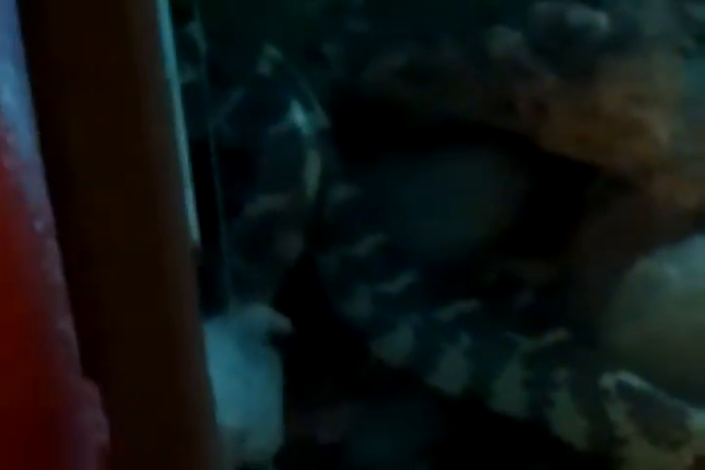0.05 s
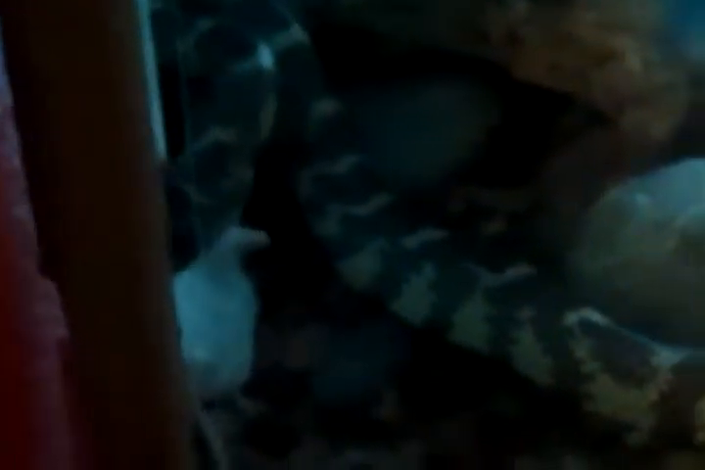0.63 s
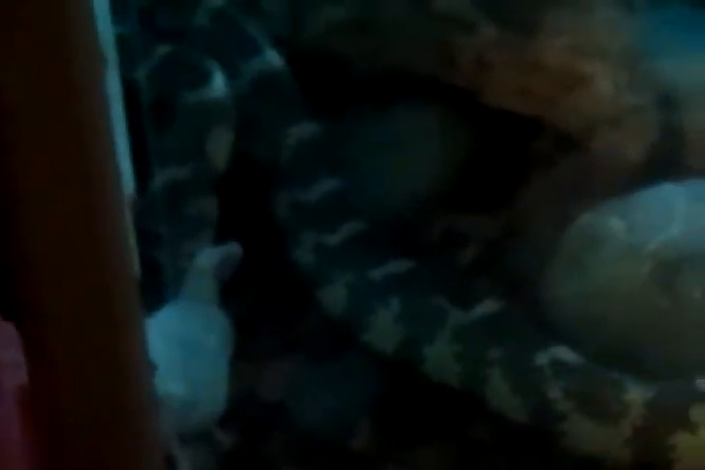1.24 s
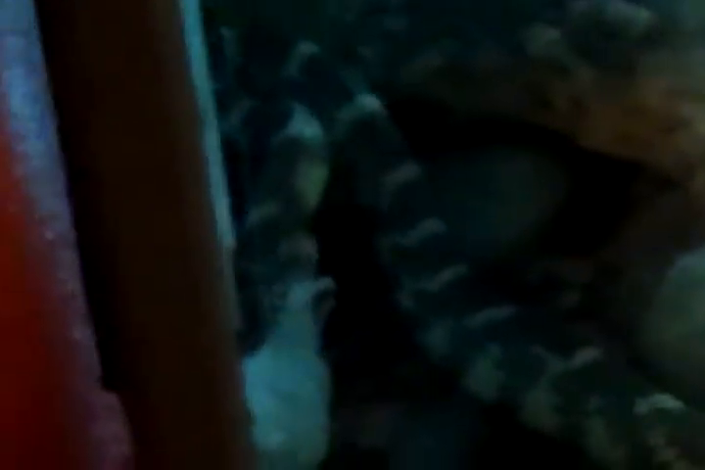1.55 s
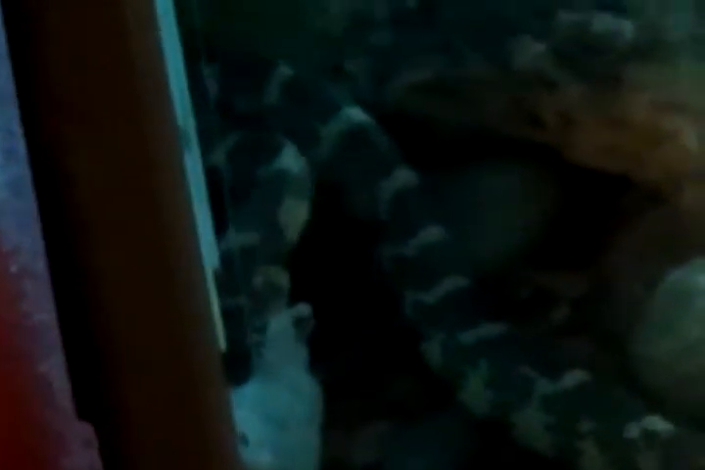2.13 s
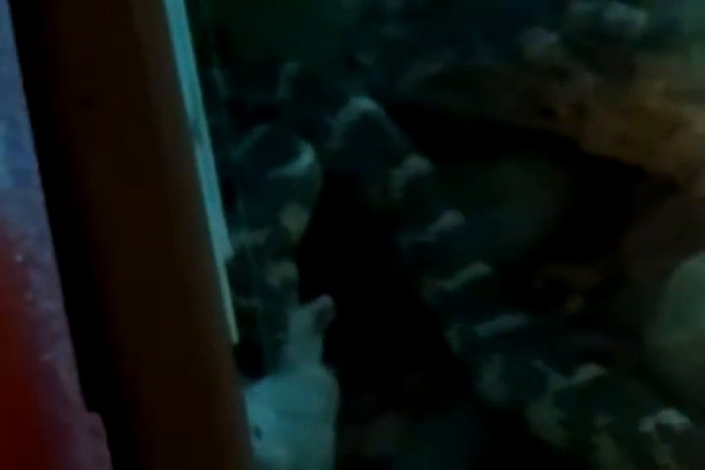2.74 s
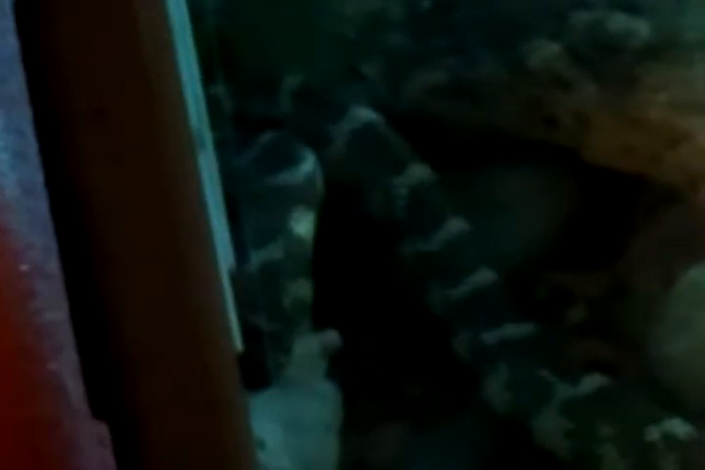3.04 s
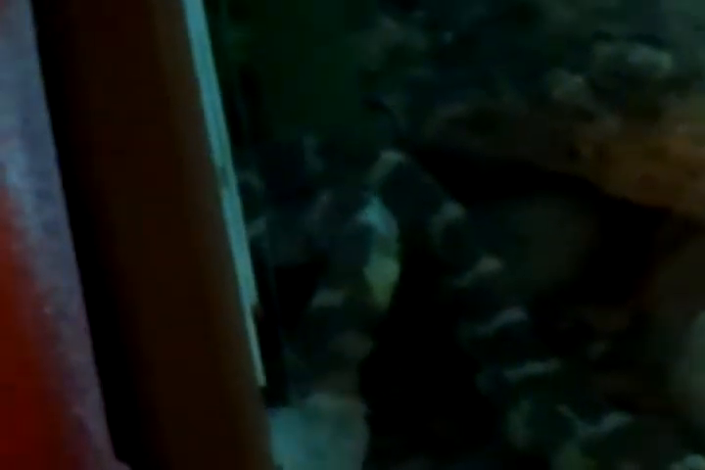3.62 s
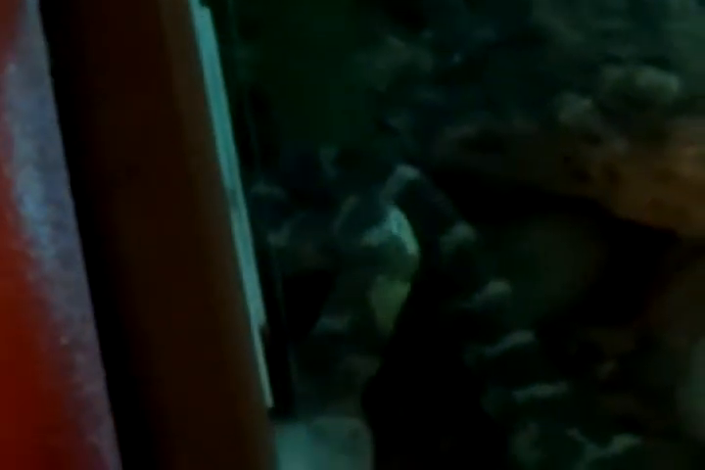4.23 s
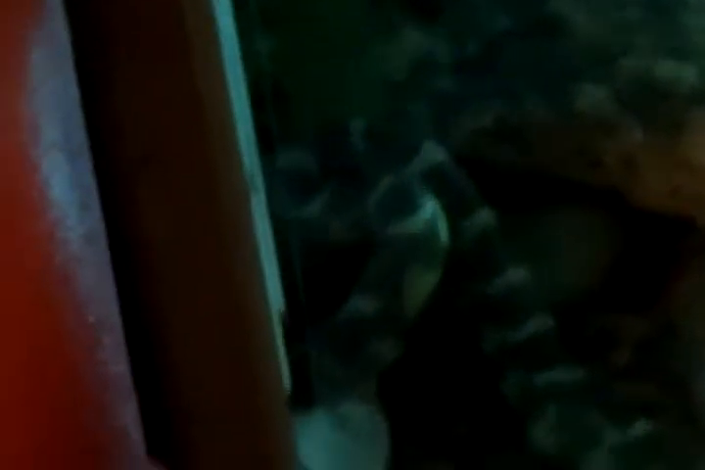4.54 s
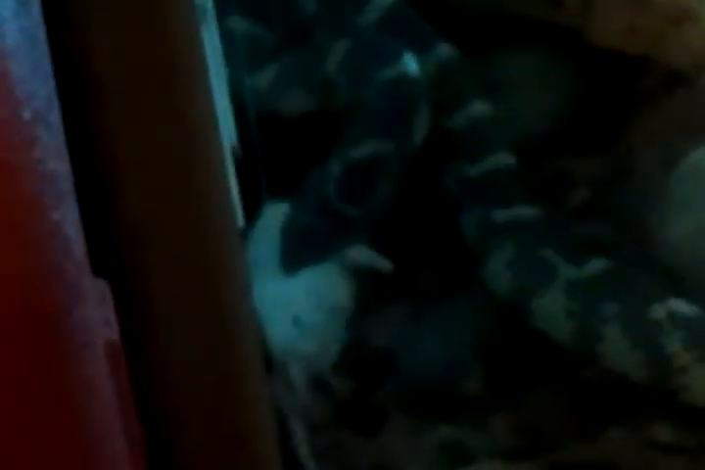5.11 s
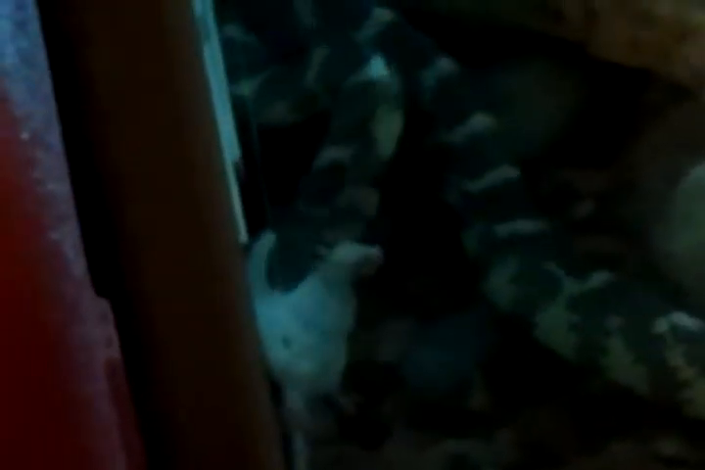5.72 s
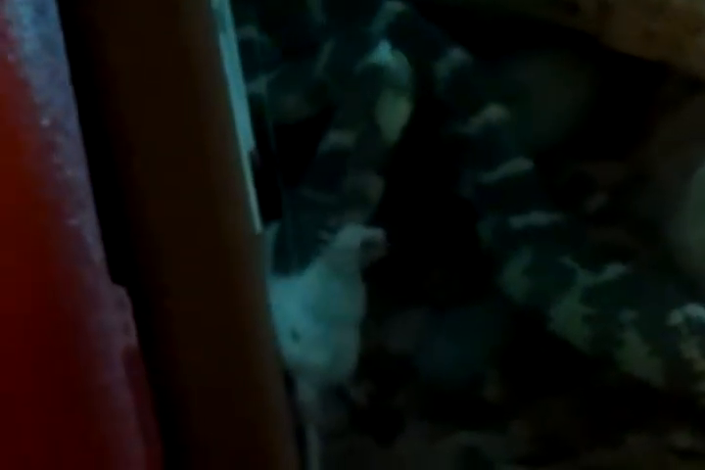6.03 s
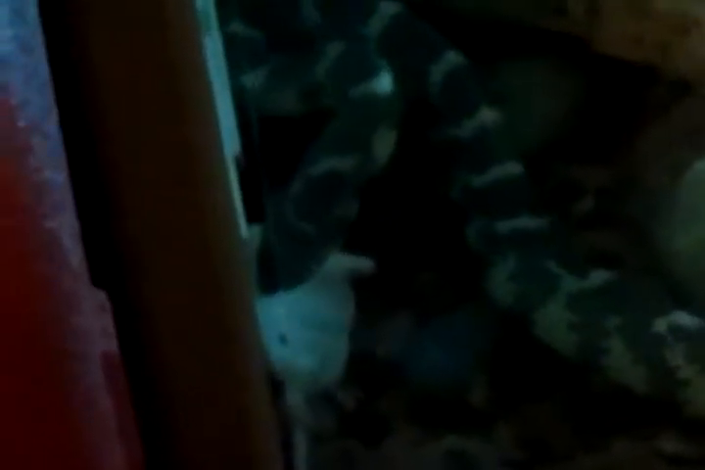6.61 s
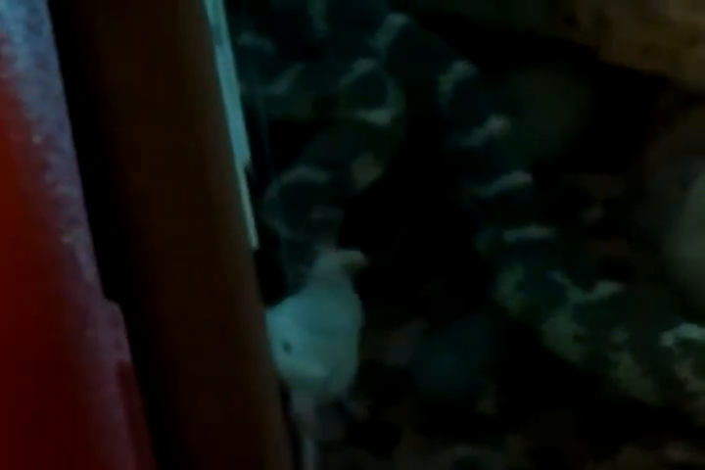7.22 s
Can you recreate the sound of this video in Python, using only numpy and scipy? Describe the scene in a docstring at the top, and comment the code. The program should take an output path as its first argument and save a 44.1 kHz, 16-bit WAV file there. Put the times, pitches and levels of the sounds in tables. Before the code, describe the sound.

A snake's scales faintly brush over stones a few times under steady low rumble and hiss in a quiet room.

```python
"""A quiet room with a terrarium, where a snake slowly drags a mouse over stones.
From the start, soft room rumble and a faint mains hum lie under the hiss of a small camera's amplifier.
At 2.8 s the snake's scales brush the ground, a friction noise made of many tiny clicks.
Near 3.7 s the low rumble swells faintly and briefly; just after, one grain of grit ticks on a stone.
Between 5.2 and 5.7 s the scales brush three more times; then the steady background is left."""
import sys
import numpy as np
from scipy import signal
from scipy.fft import rfft, irfft
from scipy.io import wavfile

SR = 44100
rng = np.random.default_rng(int(sys.argv[2]) if len(sys.argv) > 2 else 0)


def file_out(sig):
    """Save sig as 16-bit WAV at sys.argv[1]."""
    # one column per channel
    cols = np.atleast_2d(sig).T
    # limit, then scale
    lim = np.clip(cols, -1, 1)
    pcm = np.round(lim * 32767).astype(np.int16)
    wavfile.write(sys.argv[1], SR, pcm)


N = 329427


def undb(db):
    """The decibel scale: a level becomes an amplitude ratio."""
    return 10 ** (np.asarray(db) / 20)


def level(x, db):
    """Normalisation: scale a sound to an rms level."""
    return x * undb(db) / np.sqrt(np.mean(x ** 2))


def coloured_noise(points):
    """Spectral shaping: white noise follows (f/Hz, level/dB) points joined on a log-frequency axis."""
    hz, db = np.transpose(points)
    f = np.maximum(np.fft.rfftfreq(N, 1 / SR), 1)
    gain = undb(np.interp(np.log(f), np.log(hz), db))
    return irfft(rfft(rng.standard_normal(N)) * gain, N)


def resonate(x, hz, width_hz):
    """A second-order resonance, with gain 1 at its centre."""
    return signal.lfilter(*signal.iirpeak(hz, hz / width_hz, fs=SR), x)


def room_and_amplifier(rms_db=-53):
    """Broadband noise: room rumble falls with frequency until it meets the amplifier's flat hiss."""
    # spectrum of the noise floor: f/Hz, relative spectral density level/dB
    floor_spectrum = [(10, -9), (20, -4), (35, -0.5), (65, -3.5), (120, -4.5), (250, -9.5), (450, -12.5),
                      (750, -15.5), (1300, -19), (2100, -21.5), (3200, -23), (5000, -23.5), (7400, -24)]
    return level(coloured_noise(floor_spectrum), rms_db)


def mains_hum(t, mains_hz=49.7):
    """Harmonic vibration: an appliance hums at the mains frequency and its octave."""
    # partials of the hum: harmonic number, rms level/dB
    harmonics = [(1, -67), (2, -75)]
    return sum(np.sqrt(2) * undb(db) * np.sin(2 * np.pi * (k * mains_hz * t + rng.random()))
               for k, db in harmonics)


def rumble_swell(t, hz=92, swell_s=.013):
    """A Gaussian tone pulse: a few low cycles add a faint, brief swell to the room rumble."""
    # pulses: centre t/s, envelope peak level/dB
    pulses = [(3.662, -48)]
    out = np.zeros(N)
    for at, db in pulses:
        envelope = undb(db) * np.exp(-((t - at) / swell_s) ** 2)
        out += envelope * np.sin(2 * np.pi * (hz * t + rng.random()))
    return out


def grit(t, low_hz=3300, high_hz=6800, decay_s=.0006):
    """Damped free vibration: a grain slips against a stone and rings briefly in two modes."""
    # ticks of grit: onset t/s, initial envelope level/dB
    ticks = [(3.7185, -39.5)]
    out = np.zeros(N)
    for at, db in ticks:
        age = np.maximum(t - at, 0)
        ring = np.sin(2 * np.pi * low_hz * age) + np.sin(2 * np.pi * high_hz * age)
        out += undb(db) * ring / 2 * np.exp(-age / decay_s)
    return out


def rubbing_envelope(t, fade_per_rise=1.35):
    """Incoherent addition: slides sum in power, each with a Gaussian rise and an exponential decay."""
    # slides over the ground: firmest contact t/s, rise time/s, level/dB
    slides = [ (2.805, .025, -62.5), (5.27, .06, -67), (5.542, .03, -59), (5.62, 0.059, -58), ]
    power = np.zeros(N)
    for at, rise, db in slides:
        progress = (t - at) / rise
        exponent = np.where(progress < 0, progress ** 2, progress / fade_per_rise)
        power += (undb(db) * np.exp(-exponent)) ** 2
    return np.sqrt(power)


def scales(t, catches_per_s=6000, scatter_db=2):
    """Stick-slip friction: scale edges catch and let go on stone, and the clicks excite two resonances."""
    # resonances, the lower sounding later: centre f/Hz, stage bandwidth/Hz, relative level/dB, lag/s
    resonances = [(6600, 3200, 1, 0), (4030, 1160, -4.5, .018)]
    catches = rng.random(N) < catches_per_s / SR
    clicks = catches * rng.choice([-1, 1], N) * undb(scatter_db * rng.standard_normal(N))
    out = np.zeros(N)
    for hz, width, db, lag in resonances:
        band = resonate(resonate(clicks, hz, width), hz, width)
        out += rubbing_envelope(t - lag) * level(band, db)
    return out


def scene():
    """Superposition: the steady background and the small sounds add in one channel."""
    t = np.arange(N) / SR
    return (room_and_amplifier() + mains_hum(t) + scales(t) + grit(t) + rumble_swell(t))[None]


def record(dry, rolloff_hz=7913, top_hz=8850, offset=0.014):
    """Low-pass filtering: the camera rolls off the treble, cuts the top and rests a little off zero."""
    soft = signal.sosfilt(signal.butter(N=21, Wn=rolloff_hz, fs=SR, output="sos"), dry)
    return signal.sosfilt(signal.ellip(10, .1, 70, top_hz, fs=SR, output="sos"), soft) + offset


dry = scene()
out = record(dry)
file_out(out)
```